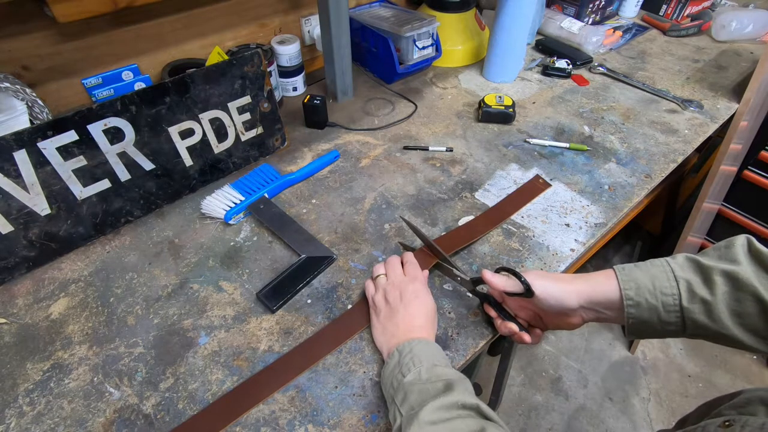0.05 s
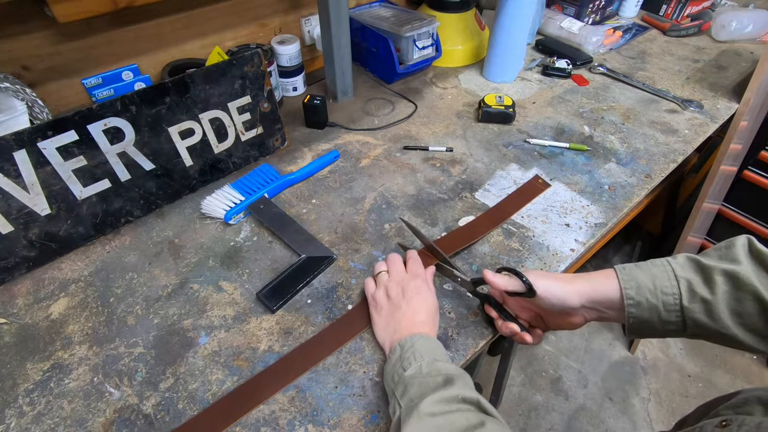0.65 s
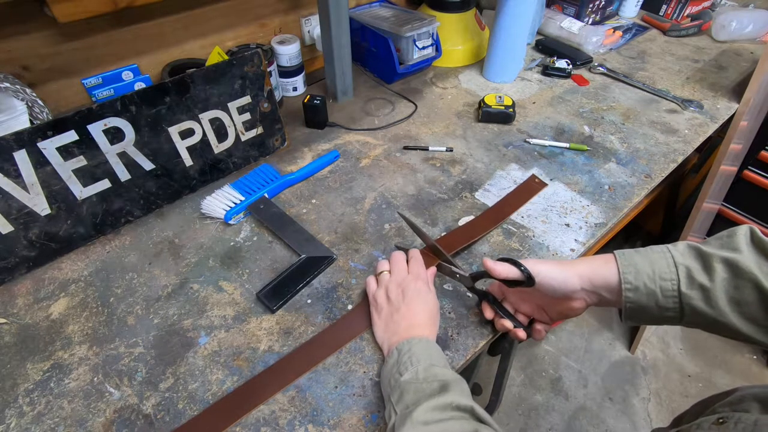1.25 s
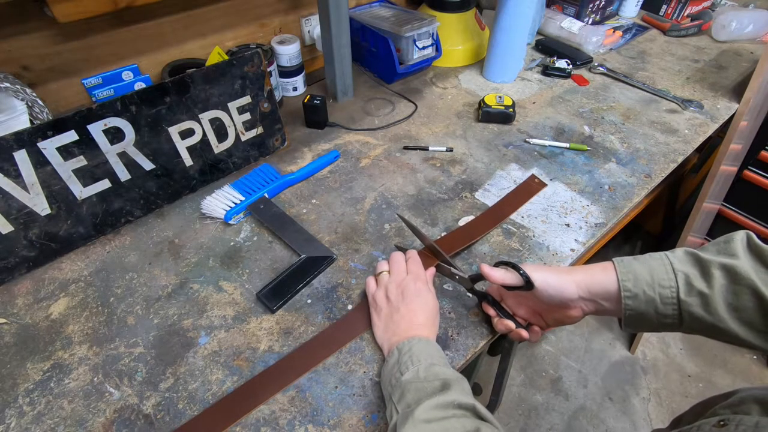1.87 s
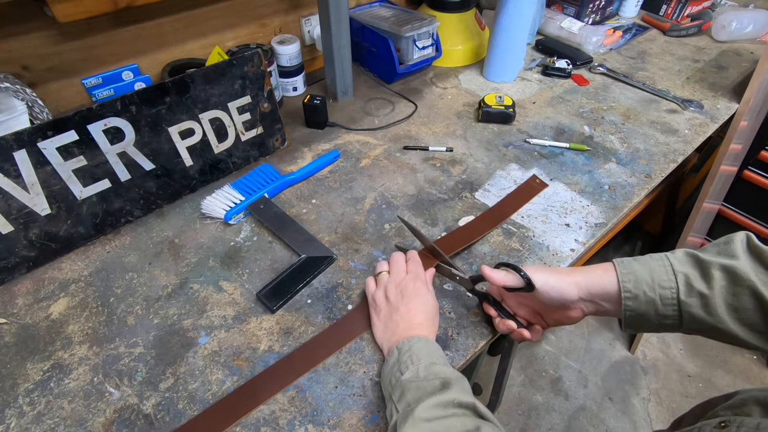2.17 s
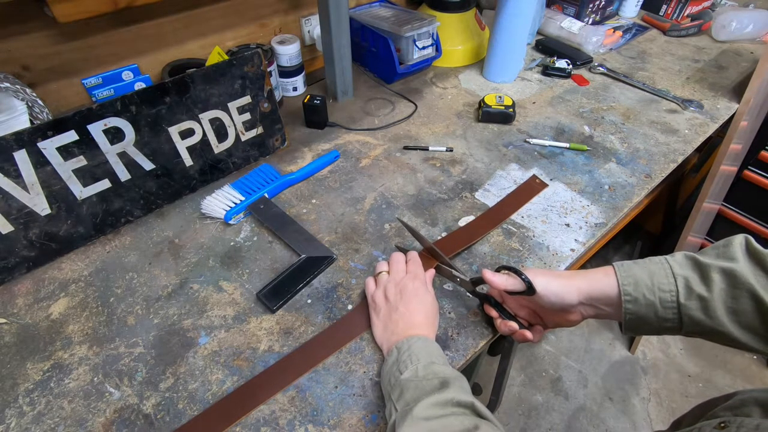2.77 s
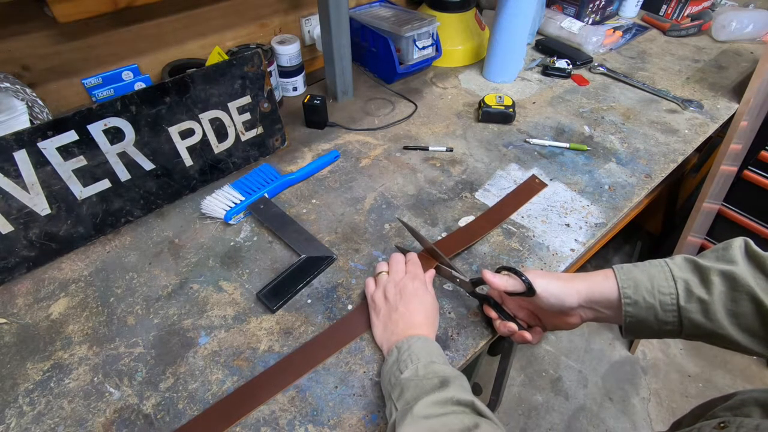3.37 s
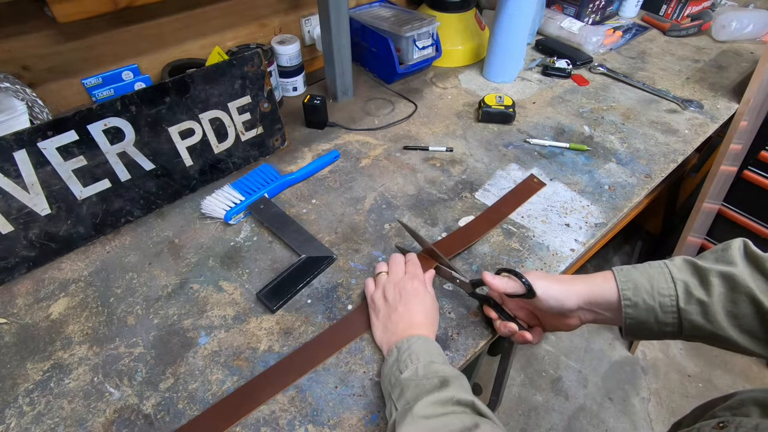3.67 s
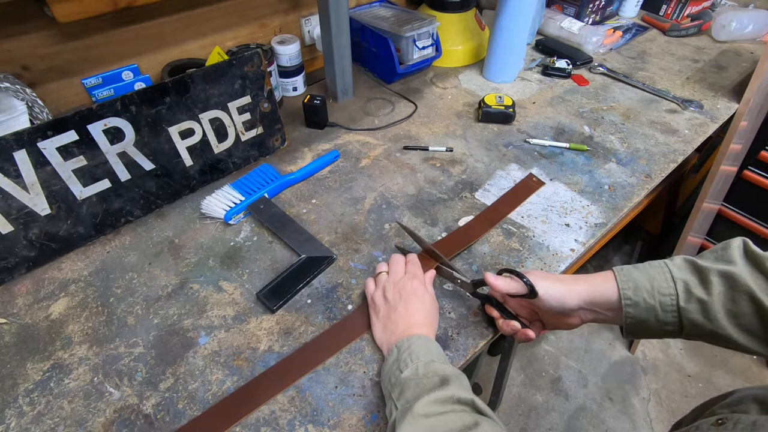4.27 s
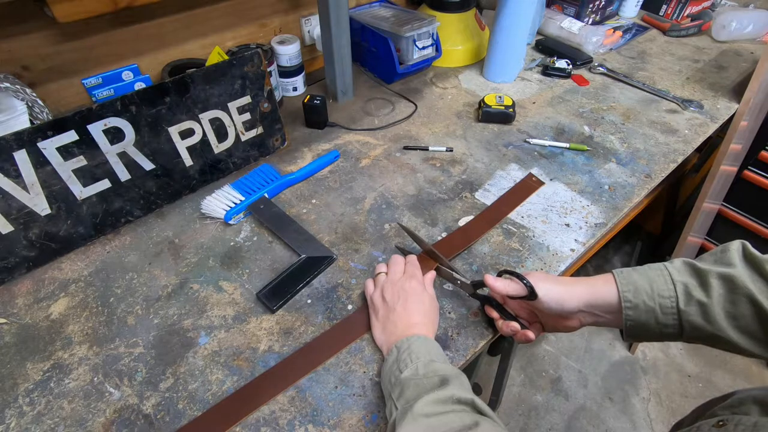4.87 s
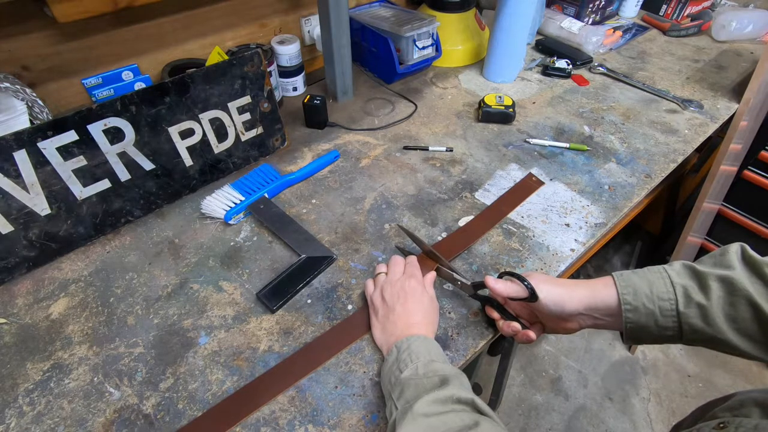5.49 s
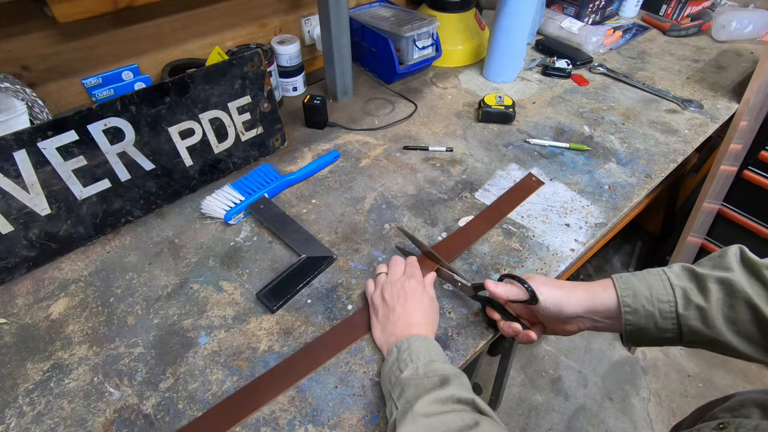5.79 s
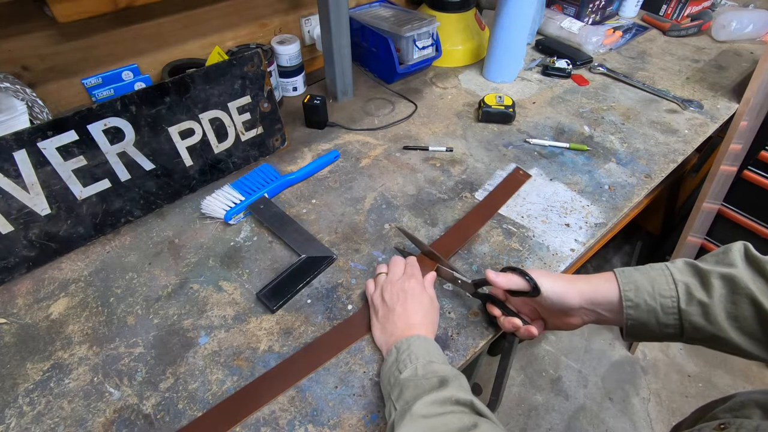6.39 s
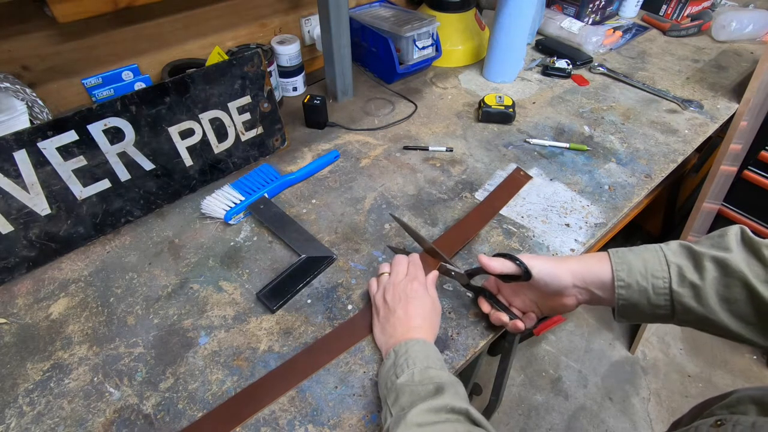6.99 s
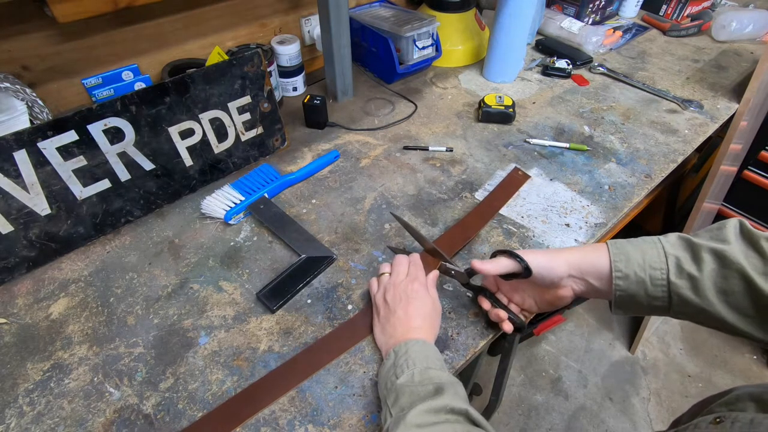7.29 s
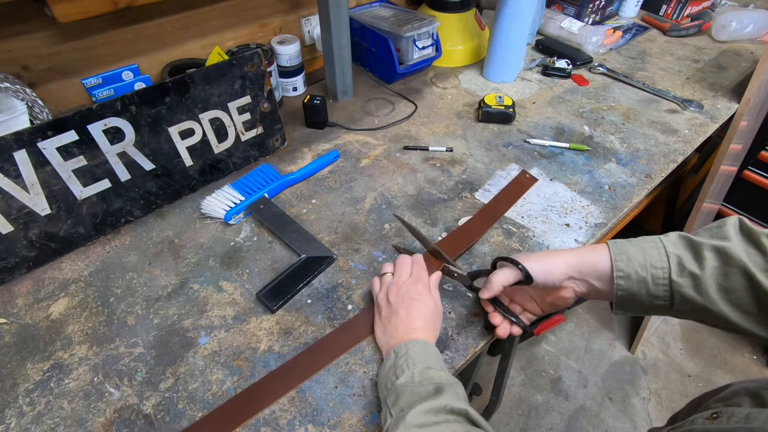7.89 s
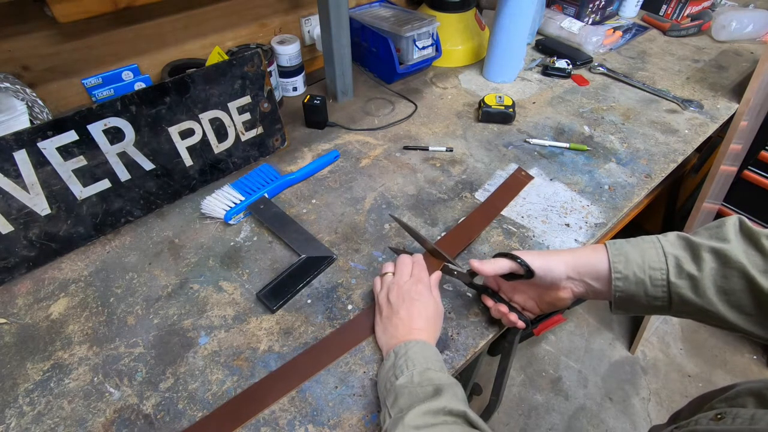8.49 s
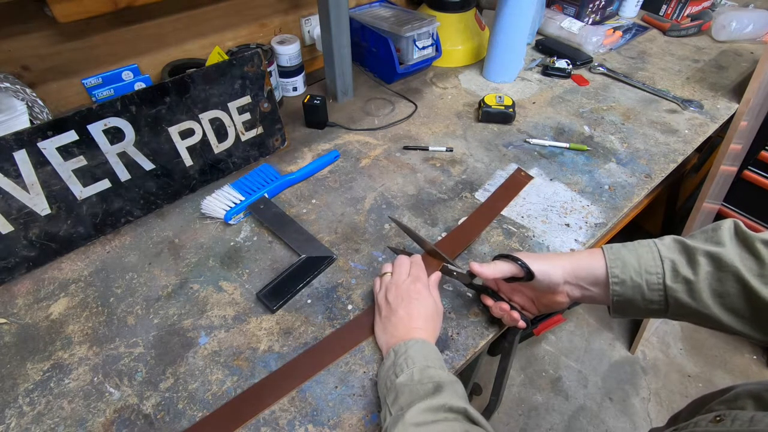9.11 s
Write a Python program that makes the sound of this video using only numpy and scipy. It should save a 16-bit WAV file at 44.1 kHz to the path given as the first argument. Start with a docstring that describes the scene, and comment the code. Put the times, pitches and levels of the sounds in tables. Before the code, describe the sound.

Short crunching bites of scissors through tough leather, with metallic clicks, dull bench thumps and a few hard knocks on wood.

```python
"""Heavy shears cut a thick leather strap on a wooden bench in a quiet workshop.
First, tearing fibres crunch and ring the blades, the lower blade judders on the bench, the steel snaps
shut (1.1 s). Small bites, pivot ticks and thumps of the bench lead to a run of cuts (3.7-6.3 s).
The blade judders again; strap and sleeves slide as the hands regrip. The shears knock hard on the bench
(6.9-8.2 s) and the last fibres snap (7.5 s). At the end, bare edges rasp over faint air and rumble."""
import sys
import numpy as np
from scipy import signal
from scipy.fft import rfft, irfft, next_fast_len
from scipy.io import wavfile
from scipy.ndimage import uniform_filter1d

SR = 44100
rng = np.random.default_rng(int(sys.argv[2]) if len(sys.argv) > 2 else 0)


def materialize(psi):
    """Save the field psi as 16-bit PCM at rate SR to the path in sys.argv[1].

    A 1-D psi becomes a single channel; in a 2-D psi each row is a channel.
    """
    bounded = np.clip(np.atleast_2d(psi).T, -1, 1)
    quanta = np.round(bounded * 32767).astype(np.int16)
    wavfile.write(sys.argv[1], SR, quanta)


N = 407925
TIME_S = np.arange(N) / SR

# Event levels are ahead of each source's gains and filters.
# edges bite the strap: start_s, length_s, ring_db, crunch_rel_db
BITES = [(0.5, .045, -61, -1), (0.58, 0.032, -61.5, -10), (0.968, 0.1, -60.5, -2), (1.098, 0.069, -58, 1.5),
         (1.9, 0.038, -70, 4), (2.25, 0.024, -75, 14.5), (2.533, 0.011, -68.5, 8.5),
         (2.868, 0.025, -65, 6.5), (3.7, 0.018, -71, 5), (3.735, 0.034, -58, 9), (4.099, 0.12, -66, 8.5),
         (4.868, 0.042, -63.5, 5), (4.918, 0.072, -63.5, 7), (5.252, 0.12, -58.5, 7),
         (5.634, 0.095, -60, 6), (5.708, 0.23, -63, 5), (6.012, 0.069, -65, 6), (6.265, 0.028, -68, -12)]
# fibre bundles break: start_s, ring_db, crunch_rel_db, decay_s
SNAPS = [(0.532, -61, -12, 0.0073), (1.0652, -55, 5, 0.0059), (2.8824, -65, 7.5, 0.015),
         (3.7375, -58.5, 5, 0.013), (3.75, -49.5, 3, 0.0036), (3.769, -57, 0, 0.0087),
         (4.0958, -63.5, 4, 0.027), (4.129, -50.5, 3, 0.0047), (4.137, -57.5, 9, 0.01),
         (4.1554, -56.5, 7, 0.005), (4.8732, -58.5, 4, 0.0052), (4.936, -59, 4.5, 0.016),
         (4.9812, -52.5, 4, 0.0031), (5.253, -53, 3.5, 0.0092), (5.2972, -54.5, 2, 0.014),
         (5.3103, -59.5, -2, 0.014), (5.6362, -61, -2, 0.006), (5.6497, -59, 5, 0.0029),
         (5.7172, -52, 5, 0.018), (5.8784, -51, 4, 0.011), (5.89, -66, 17, 0.0047),
         (6.0197, -61.5, 6, 0.015), (6.096, -68, 18, 0.0062), (7.5164, -48.5, 17, 0.0066)]
# edge rubs on edge: start_s, length_s, squeak_db, low_ring_rel_db, squeak_hz
RASPS = [(6.624, 0.046, -68.5, 10, 5290), (6.672, 0.028, -61, 11.5, 5350), (7.998, 0.03, -67, 7.5, 5200),
         (8.073, .035, -62.5, -21, 4650), (8.163, .014, -56.5, -10, 4400), (8.185, 0.028, -54, -21, 4360),
         (8.635, 0.13, -72.5, 3, 4600), (8.702, 0.0062, -66, 3.5, 4500), (8.77, 0.0069, -67.5, -4, 4680),
         (8.88, 0.025, -71.5, -3, 4900), (8.933, 0.045, -75, 7, 4680), (8.947, 0.0036, -58.5, 1.5, 4770),
         (9.036, .008, -59, 4.5, 4760), (9.049, 0.019, -61.5, 5.5, 4750)]
# steel hits steel: start_s, level_db, body_rel_db, ring_rel_db
CLICKS = [(0.068, -67, 6, 9), (0.279, -67, 8, 4), (0.305, -64, 0, -8), (1.1468, -32, -4, 4),
          (1.154, -53, 14, -16), (1.793, -59, -12, -8), (1.838, -59, -16, -11), (2.1473, -64.5, -12, 10),
          (2.418, -69.5, 10, -5), (2.823, -68, 10, -9), (3.256, -69.5, 12, -12), (4.367, -62, 3, -6),
          (4.711, -56, -3, -5), (5.144, -61, 2, -13), (7.2094, -59, -8, -8), (7.4542, -38.5, -12, -8),
          (7.4753, -52, -5, -9), (7.4813, -37.5, -15, -8), (7.693, -45.5, -15, 1), (7.814, -53.5, 5, 9)]
# bright tails of the loud snaps: start_s, level_db
SNAP_TAILS = [(1.147, -55), (7.514, -58)]
# shears hit the bench: start_s, level_db, bass_rel_db, crack_rel_db
KNOCKS = [(0.312, -53.5, -30, -11), (2.256, -50, -1, -32), (2.272, -38, -1, -18.5),
          (2.557, -35.5, -2, -23.5), (3.764, -43.5, 2.5, -15), (4.133, -42, -10.5, -21),
          (4.713, -56, -2.5, -12.5), (5.31, -50.5, -9.5, -7.5), (5.72, -54, 8, -11),
          (6.922, -27.5, -11.5, -20), (7.096, -34.5, -13.5, -22), (7.14, -48, -8, -5),
          (7.513, -24.5, -8.5, -16), (7.699, -41, 1, -17), (7.724, -56, 3, 1), (7.949, -47, -4, -32),
          (8.171, -30, -15, -10.5), (8.184, -25.5, -6, -33), (8.482, -52.5, -34, -7.5)]
# bench flexes: start_s, level_db, pitch_hz
THUMPS = [(1.129, -50.5, 60), (1.384, -53, 60.5), (2.254, -42.5, 81), (2.294, -38.5, 96.7),
          (2.374, -49, 100), (2.595, -38.5, 98.2), (2.921, -51.5, 94.4), (3.151, -46, 90), (3.502, -62, 96),
          (3.782, -37, 105.3), (3.833, -40.5, 90.5), (3.939, -45.5, 95.4), (4.103, -52, 92),
          (4.23, -49, 96), (4.458, -53, 91), (5.02, -49.5, 96.5), (5.412, -59, 98), (5.76, -44.5, 107),
          (6.952, -47, 108.6), (7.714, -47, 102.4), (8.193, -36, 112)]
# blade skids on the bench: start_s, level_db, pitch_hz, swell_s
JUDDERS = [(0.528, -40, 365, 0.014), (0.594, -36, 308, 0.0027), (0.604, -39.5, 312, 0.015),
           (0.638, -48, 345, 0.0092), (0.982, -50.5, 322.7, 0.022), (1.034, -40.5, 334.7, 0.011),
           (1.065, -37.5, 332, 0.012), (1.102, -31, 356, 0.022), (1.124, -43, 365.6, 0.0099),
           (1.15, -30.5, 333.6, 0.0069), (1.173, -40, 342, 0.0094), (6.268, -42, 343.6, 0.018),
           (6.299, -36.5, 346.6, 0.0085), (6.413, -41.5, 337.8, 0.016), (6.458, -42, 349.3, 0.013),
           (6.498, -32, 366.3, 0.0041), (6.653, -42, 335, 0.044), (6.692, -30.5, 360, 0.011)]
# strap and sleeves slide: start_s, length_s, level_db, treble_rel_db
SLIDES = [(0.565, 0.17, -66.5, -13.5), (0.855, 0.076, -68, -7.5), (0.965, 0.051, -87, 6),
          (1.555, 0.045, -80, -0.5), (6.41, 0.14, -65, -7), (6.64, 0.086, -69, -11),
          (6.765, 0.22, -65, -12.5), (7.42, 0.032, -62.5, -8), (7.457, 0.04, -50.5, -9),
          (7.682, 0.05, -63.5, -7), (7.775, 0.057, -69.5, -4), (8.015, 0.24, -75.5, -0.5)]
# hands lean on the bench: start_s, length_s, level_db
LEANS = [(0.041, 0.053, -60.5), (1.07, 0.13, -58), (1.357, .07, -65.5), (1.74, 0.2, -60.5),
         (3.173, 0.12, -71), (7.936, 0.14, -57)]

# modes of blades and bench top: freq_hz, level_db, t60_s
BLADE_MODES = [(1280, 10.5, 0.03), (1480, 9, .04), (1600, -10, 0.23), (1920, 10.5, 0.063),
               (4140, -6, 0.067), (4260, -23, .03), (4770, -40, 0.017), (5270, -11, 0.03), (5550, 0, 0.036),
               (10480, -18, 0.068)]
BENCH_MODES = [(93.9, -19.5, 0.37), (149.4, -4, 0.21), (181.7, -4, 0.14), (248.6, -14, 0.22),
               (299.2, -4.5, 0.14), (355.3, 4, 0.07), (433.5, -13.5, 0.098), (493.5, -12.5, 0.098),
               (569, -25.5, 0.27), (642, -26, .2), (741, -29, 0.23), (889, -24, 0.1)]

# spectral shapes: freq_hz, gain_db
LEATHER_EQ = [(80, -17), (180, -5), (250, -8), (340, 1), (470, -11), (700, -15), (1130, -17), (1300, 1),
              (1470, 4), (1650, -0.5), (1950, -5), (2400, -15), (3300, -17), (5000, -33), (12000, -60)]
BLADE_EQ = [(2000, -33), (3000, -19), (3950, -10.5), (4350, -3.5), (5100, -6), (5850, -4.5), (6500, -26.5),
            (7500, -31.5), (10000, -31), (14000, -41)]
SQUEAK_EQ = [(2000, -45), (3700, -12), (4300, 0.5), (5300, 3), (6000, 7), (6600, -20), (10000, -7),
             (14000, -22)]
LOW_RING_EQ = [(200, -12.5), (340, 3.5), (600, -35), (1220, -21), (1390, 4), (1540, -9.5), (1900, -22.5),
               (2500, -29), (9000, -53)]
CLICK_EQ = [(300, -15), (900, -12), (1350, 5.5), (1900, -8), (2600, -1), (4300, -5.5), (5400, 7),
            (6300, -1), (7200, -15), (10200, -19), (12000, -40), (14500, -41)]
SNAP_TAIL_EQ = [(300, -25), (1000, -12), (1380, 9), (1700, 1), (2400, -14), (3200, -15), (4300, -7),
                (5350, 7), (6100, -5), (7000, -20), (10200, -14), (11500, -28), (14500, -36)]
WOOD_CRACK_EQ = [(150, 3.5), (350, 11), (600, 3.5), (830, 1), (1100, -4.5), (1400, -2), (2000, -12.5),
                 (2800, -25.5), (5000, -14), (8000, -32.5), (14000, -92)]
CLOTH_EQ = [(100, -10), (300, 6), (550, 0), (1300, 2), (2500, 1), (3800, -1), (5400, 0), (6300, -7),
            (7500, -20), (12000, -45)]
CLOTH_TREBLE_EQ = [(3000, -35.5), (5500, 6.5), (7500, -1), (10000, -5), (12500, -16.5), (15000, -31)]
AIR_EQ = [(25, -5.5), (60, -4), (120, -9), (200, -4), (320, -15), (490, -15.5), (800, -6.5), (1300, -11.5),
          (2000, -21), (3300, -31.5), (5400, -26.5), (7200, -35.5), (10000, -38), (14000, -49.5)]
HARD_CONTACT_EQ = [(1000, 13), (2000, -2), (4200, -20), (5400, 4), (7000, 18), (14000, 14)]
SCRAPE_EQ = [(100, -32), (240, -7), (350, 2), (460, 0.5), (700, -23.5), (1400, -20), (3000, -56),
             (9000, -73)]
RUMBLE_EQ = [(25, -11.5), (50, 0.5), (100, -12.5), (125, -15), (170, 1), (230, -4), (320, -1.5),
             (450, -14), (900, -54.5), (3000, -79)]

# room decay: freq_hz, t60_s
ROOM_T60 = [(100, 0.84), (400, 0.43), (1500, 0.57), (5000, 0.8), (12000, 0.43)]
# left-right likeness of diffuse sound: freq_hz, coherence_ratio
COHERENCE = [(100, 0.96), (330, 0.72), (600, 0), (1500, 0), (5000, 0.63), (12000, 0.1)]
# microphone port balance: freq_hz, left_minus_right_db
PORT_BALANCE = [(100, 0), (350, -2), (520, -4), (800, -0.9), (2000, -0.4), (3800, -0.5), (4600, -3.5),
                (5700, -13.5), (6600, 2), (8000, -2), (13000, -1.5)]
# microphone port phase: freq_hz, left_lead_rad
PORT_LEAD = [(0, 0.24), (430, 0.049), (1210, 0.82), (1890, 0.3), (3360, 0.49), (4740, 0.1), (5250, 0),
             (5770, 1.62)]


def cutting():
    """Fibres break singly and in bundles; each break crunches in the leather and rings the blades."""
    bites = strokes(BITES, rise_share=0.061, sag_db=-0.5, fall_s=0.031) * amp([[-4.5], [-3.5]])
    fibres = bites * grains(rate_hz=1100, spread_db=0.5)
    bundles, t = np.zeros((2, N)), np.arange(SR // 12) / SR
    for start_s, ring_db, crunch_rel_db, decay_s in SNAPS:
        add(bundles, start_s, amp([[ring_db], [ring_db + crunch_rel_db]]) * np.exp(-t / decay_s))
    ring, crunch = fibres + bundles * grains(rate_hz=4000, spread_db=2)
    steel = colour(ring, BLADE_EQ) + amp(-12) * blade_ring(ring + amp(-9) * crunch)
    return space(steel + colour(crunch, LEATHER_EQ), near_db=2.5, room_db=-12)


def blade_ring(blows):
    """Blows excite the damped modes of the steel."""
    t = np.arange(SR // 4) / SR
    ring = sum((-1) ** k * amp(db - 60 * t / t60_s) * np.sin(2 * np.pi * hz * t)
               for k, (hz, db, t60_s) in enumerate(BLADE_MODES))
    return signal.oaconvolve(blows, ring / np.linalg.norm(ring))[:N]


def rasping():
    """Bare edges stick and slip; the squeak's pitch moves with the contact point."""
    squeak_gain, low_gain = strokes(RASPS, rise_share=0.12, sag_db=-1, fall_s=0.019)
    start_s, *_, squeak_hz = np.transpose(RASPS)
    slips = grains(rate_hz=1200, spread_db=0)
    band = resonate(slips, np.interp(TIME_S, start_s, squeak_hz), width_hz=300)
    squeak = squeak_gain * unit_rms(colour(band, SQUEAK_EQ))
    return space(squeak + colour(low_gain * slips, LOW_RING_EQ), near_db=-7, room_db=-12)


def clicks():
    """The blades catch at the pivot or snap shut: brief chatter, then a ring in the high modes."""
    blows, impulses, t = np.zeros(N), np.zeros(N), np.arange(SR // 30) / SR
    body_lowpass = signal.butter(1, 3000, fs=SR)
    for start_s, db, body_rel_db, ring_rel_db in CLICKS:
        chatter = rng.choice([-1, 1], len(t)) * np.exp(-t / 0.0018)
        body = signal.lfilter(*body_lowpass, chatter)
        add(blows, start_s, amp(db) * (chatter + (amp(body_rel_db) - 1) * body))
        add(impulses, start_s, amp([db + ring_rel_db]))
    ring = amp(18) * colour(blade_ring(impulses), HARD_CONTACT_EQ)
    return space(amp(3.5) * colour(blows, CLICK_EQ) + ring, near_db=-6, room_db=-10, near_s=0.006)


def snap_tails():
    """A loud snap's bright flash and its noisy, shimmering tail in the room."""
    tail_t60_s, flash_t60_s, flash_rel_db = 0.49, 0.035, 20
    gain, t = np.zeros(N), np.arange(SR // 2) / SR
    decay = amp(-60 * t / tail_t60_s) + amp(flash_rel_db - 60 * t / flash_t60_s)
    for start_s, db in SNAP_TAILS:
        add(gain, start_s, amp(db) * decay)
    return colour(diffuse_noise(N) * gain, SNAP_TAIL_EQ)


def knocks():
    """A blow swings the bench modes; things lying on top chatter in a short woody crack."""
    boards, crack, t = np.zeros(N), np.zeros(N), np.arange(SR // 2) / SR
    build_up = 1 - np.exp(-t / 0.0082)
    for start_s, db, bass_rel_db, crack_rel_db in KNOCKS:
        for hz, mode_db, t60_s in BENCH_MODES:
            weight_db = bass_rel_db + 5.5 if hz < 220 else 0
            swing = np.sin(2 * np.pi * (hz * rng.uniform(1, 1.015) * t + rng.random()))
            add(boards, start_s, amp(db + mode_db + weight_db - 60 * t / t60_s) * build_up * swing)
        add(crack, start_s, amp(db + crack_rel_db) * np.exp(-t / 0.022) * rng.standard_normal(len(t)))
    return (amp(3) * space(boards, near_db=-15.5, room_db=-9.5)
            + amp(7) * space(colour(crack, WOOD_CRACK_EQ), near_db=-12, room_db=-3))


def thumps():
    """The pushed bench top gives and swings back, its frame lower, its next mode higher."""
    frame_ratio, overtone_hz = 0.62, 150.6
    sound, t = np.zeros(N), np.arange(SR // 2) / SR
    swell = (1 - np.exp(-t / 0.014)) * np.exp(-t / 0.035)
    overtone = amp(-13) * np.sin(2 * np.pi * overtone_hz * t)
    for start_s, db, hz in THUMPS:
        top = np.sin(2 * np.pi * hz * t)
        frame = amp(-6.5) * np.sin(2 * np.pi * frame_ratio * hz * t)
        add(sound, start_s, amp(db + 1.5) * swell * (top + frame + overtone))
    return sound


def judders():
    """The lower blade sticks and slips near the bench's strongest mode, in short wavering swells."""
    power, t = np.zeros(N), np.arange(SR // 6) / SR
    for start_s, db, _, swell_s in JUDDERS:
        progress = t / max(swell_s, 0.003)
        add(power, start_s, amp(2 * db) * (progress * np.exp(1 - progress)) ** 4)
    start_s, _, pitch_hz, _ = np.transpose(JUDDERS)
    waver = 0.03 * unit_rms(uniform_filter1d(rng.standard_normal(N), SR // 200))
    cycles = np.cumsum(np.interp(TIME_S, start_s, pitch_hz) * (1 + waver)) / SR
    scrape = amp(-12.5) * colour(grains(rate_hz=1500, spread_db=5), SCRAPE_EQ)
    skid = np.sqrt(power) * (np.sin(2 * np.pi * cycles) + scrape)
    return amp(-2.5) * space(skid, near_db=-22, room_db=-9.5)


def sliding():
    """Strap and canvas sleeves rub in a dense fine grain, each slide with its own brightness."""
    body_gain, treble_gain = strokes(SLIDES, rise_share=0.13, sag_db=-2.5, fall_s=0.029)
    rub = grains(rate_hz=4100, spread_db=-2)
    body = amp(5) * colour(body_gain * rub, CLOTH_EQ)
    treble = amp(6) * colour(treble_gain * rub, CLOTH_TREBLE_EQ)
    return space(body + treble, near_db=-2.5, room_db=-5.5)


def bench_rumble():
    """The bench rumbles under resting and leaning hands, with each bite and after each knock."""
    rest_db, shake_decay_s, shake_db_per_db = -70, 0.19, 0.19
    lean, _ = strokes([(*row, 0) for row in LEANS], rise_share=0.17, sag_db=0, fall_s=0.04)
    _, bite = strokes(BITES, rise_share=0.17, sag_db=0, fall_s=0.03)
    power = amp(rest_db) ** 2 + lean ** 2 + (amp(-7) * bite) ** 2
    t = np.arange(SR) / SR
    hardest_db = max(row[1] for row in KNOCKS)
    for start_s, db, bass_rel_db, _ in KNOCKS:
        shake_db = -60 + shake_db_per_db * (db + bass_rel_db - hardest_db)
        add(power, start_s, (amp(shake_db) * np.exp(-t / shake_decay_s)) ** 2)
    return colour(diffuse_noise(N) * np.sqrt(power), RUMBLE_EQ)


def room_air():
    """Still workshop air: faint steady noise."""
    return amp(-67) * unit_rms(colour(diffuse_noise(N), AIR_EQ))


def space(x, near_db, room_db, near_s=0.0034):
    """Direct sound, quick scatter off the bench and its clutter, then the room tail."""
    t = np.arange(SR // 2) / SR
    near = diffuse_noise(len(t)) * np.exp(-t / near_s) * (t > 0.0005)
    hz, frame_s, spectra = signal.stft(diffuse_noise(len(t)), SR, nperseg=256)
    spectra *= amp(-60 * frame_s / curve_at(ROOM_T60, hz)[:, None])
    tail = signal.istft(spectra, SR, nperseg=256)[1][:, :len(t)] * (1 - np.exp(-t / 0.0037))
    response = (amp(near_db) * unit_rms(near) + amp(room_db) * unit_rms(tail)) / np.sqrt(len(t))
    response[:, 0] += 1
    return signal.oaconvolve(x * np.ones((2, 1)), response / np.linalg.norm(response[0]), axes=1)[:, :N]


def strokes(rows, rise_share, sag_db, fall_s):
    """Two gain curves, at db and db + rel_db: swell, sagging hold, release."""
    gains = np.zeros((2, N))
    for start_s, length_s, db, rel_db, *_ in rows:
        t = np.arange(0, length_s + 8 * fall_s, 1 / SR)
        swell = 1 - np.exp(-t / (rise_share * length_s))
        sag = amp(sag_db * np.minimum(t / length_s, 1))
        release = np.exp(-np.maximum(t - length_s, 0) / fall_s)
        add(gains, start_s, amp([[db], [db + rel_db]]) * swell * sag * release)
    return gains


def grains(rate_hz, spread_db):
    """Random impulses of tiny breaks or slips; spread_db varies their size."""
    size = amp(spread_db * np.minimum(rng.exponential(1, N), 4))
    return unit_rms(size * rng.choice([-1, 1], N) * (rng.random(N) < rate_hz / SR))


def diffuse_noise(size):
    """Stereo noise, its sides most alike in the bass."""
    left, other = rfft(rng.standard_normal((2, size)))
    coherence = np.clip(curve_at(COHERENCE, np.fft.rfftfreq(size, 1 / SR)), 0, 1)
    right = coherence * left + np.sqrt(1 - coherence ** 2) * other
    return irfft(np.array([left, right]), size)


def colour(x, eq, size=4096):
    """Minimum-phase filter of unit energy: rings after a blow, never before."""
    log_gain = np.log(amp(curve_at(eq, abs(np.fft.fftfreq(size, 1 / SR)))))
    ring = np.fft.ifft(np.exp(np.conj(signal.hilbert(log_gain)))).real[:size // 2]
    return signal.oaconvolve(np.atleast_2d(x), ring[None] / np.linalg.norm(ring), axes=1)[:, :x.shape[-1]]


def resonate(x, hz, width_hz):
    """Unity-gain resonance following the curve hz."""
    carrier = np.exp(2j * np.pi * np.cumsum(hz) / SR)
    pole = np.exp(-np.pi * width_hz / SR)
    return 2 * (carrier * signal.lfilter([1 - pole], [1, -pole], x / carrier)).real


def curve_at(points, hz):
    """Interpolates on a log-frequency axis."""
    point_hz, value = np.transpose(points)
    return np.interp(np.log(hz + 1), np.log(point_hz + 1), value)


def add(mix, start_s, sound):
    """Mixes a sound in at start_s."""
    part = mix[..., max(round(start_s * SR), 0):][..., :sound.shape[-1]]
    part += sound[..., :part.shape[-1]]


def amp(db):
    """Decibels to gain."""
    return 10 ** (np.asarray(db) / 20)


def unit_rms(x):
    """Scales to rms 1."""
    return x / np.sqrt(np.mean(x ** 2) + 1e-20)


def scene():
    """Shears, bench and background, heard from just above the bench."""
    shears = cutting() + rasping() + clicks() + snap_tails()
    bench = knocks() + thumps() + judders()
    return shears + bench + sliding() + bench_rumble() + room_air()


def record(dry):
    """Two microphone ports, the right slightly late and resonant in the treble; then a low-pass."""
    cutoff_hz = 14600
    size = next_fast_len(N + SR // 10)
    hz = np.fft.rfftfreq(size, 1 / SR)
    balance_db, lead_rad = curve_at(PORT_BALANCE, hz), curve_at(PORT_LEAD, hz)
    gains = amp([balance_db / 2, -balance_db / 2])
    ports = gains / gains.mean(0) * np.exp([0.5j * lead_rad, -0.5j * lead_rad])
    heard = irfft(rfft(dry, size) * ports, size)[:, :N]
    lowpass = signal.firwin(511, cutoff_hz, window=("kaiser", 9), fs=SR)
    return signal.oaconvolve(heard, lowpass[None], "same")


dry = scene()
out = record(dry)
materialize(out)
```